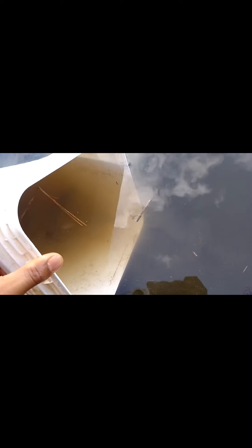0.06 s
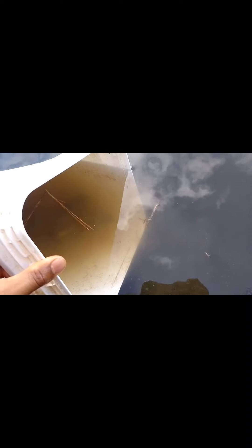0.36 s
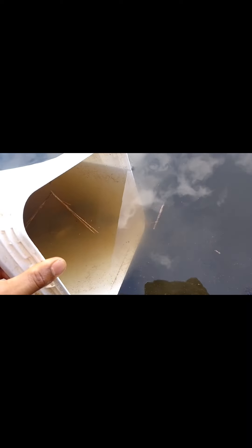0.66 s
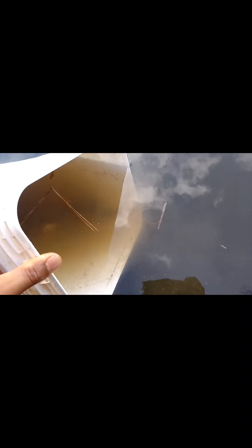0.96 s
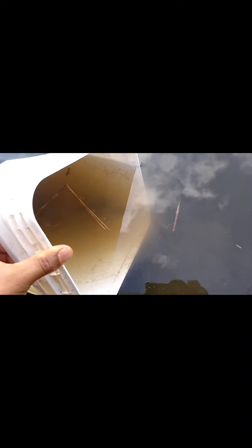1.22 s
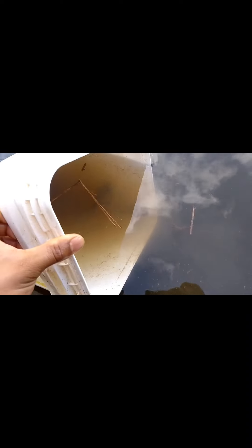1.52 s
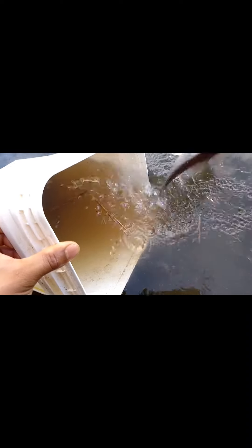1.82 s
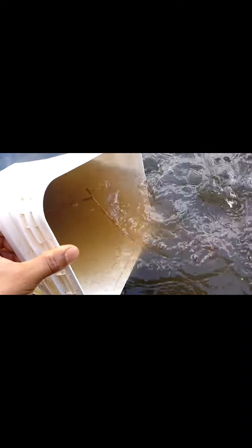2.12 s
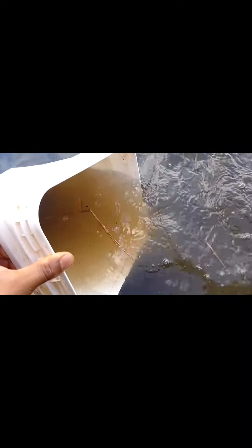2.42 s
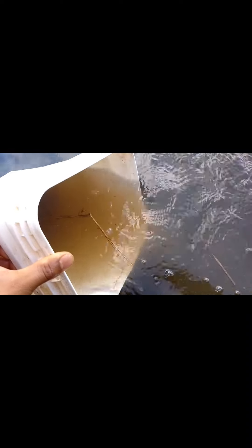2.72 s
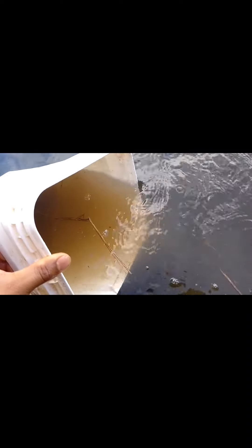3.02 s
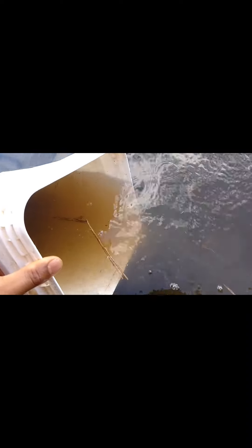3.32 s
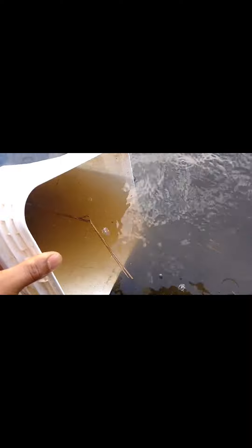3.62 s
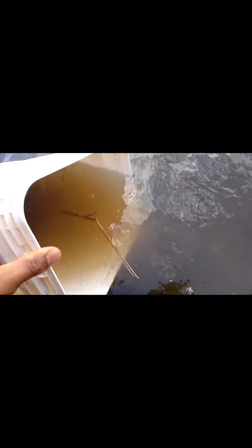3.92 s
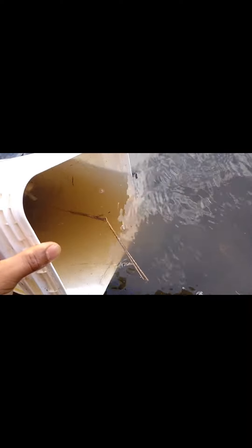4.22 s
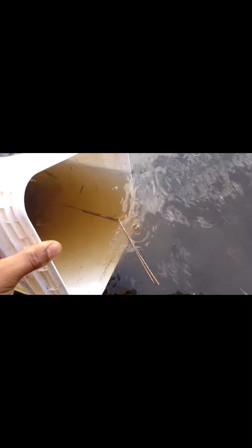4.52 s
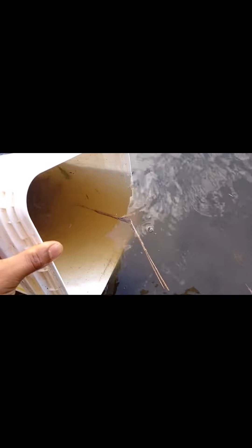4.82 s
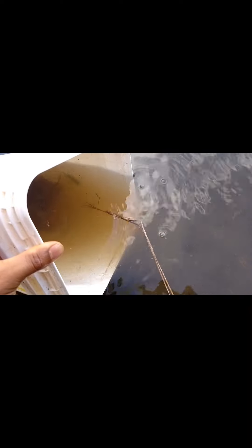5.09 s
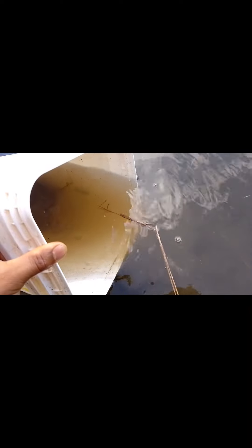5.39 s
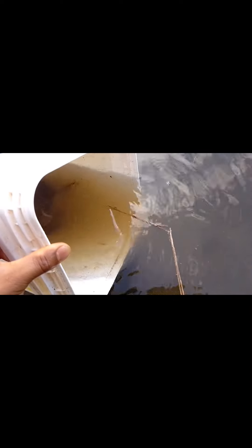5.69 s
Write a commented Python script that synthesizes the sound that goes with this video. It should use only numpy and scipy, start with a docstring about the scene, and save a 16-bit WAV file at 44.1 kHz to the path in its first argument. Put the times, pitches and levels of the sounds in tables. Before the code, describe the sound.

A plastic tub thumps and tips water into a reservoir with a sharp splash, amid faint insects and distant birds.

```python
"""The edge of a reservoir, one microphone close to the water. A plastic tub is tipped out in front
of it: the tub thumps, the load slaps into the water, spray patters down and trapped bubbles ring.
Insects buzz in the grass all round, and near the end a bush-cricket starts scraping its wings,
shrill and high. Far off across the water, birds whistle and chatter."""
import sys
import numpy as np
from scipy import signal
from scipy.fft import rfft, irfft
from scipy.io import wavfile
from scipy.ndimage import uniform_filter1d

SR = 44100
rng = np.random.default_rng(int(sys.argv[2]) if len(sys.argv) > 2 else 0)


def wav_out(sig):
    """Save sig, one row per channel (or a flat mono array), as 16-bit PCM at SR to the path in sys.argv[1]."""
    wavfile.write(sys.argv[1], SR, np.round(np.clip(np.atleast_2d(sig).T, -1, 1) * 32767).astype(np.int16))


N = 253575
TIME = np.arange(N) / SR
POUR_S, POUR_END_S, LAST_DROPS_S = 1.75, 2.224, 2.5
CRICKET_S = 4.25

# Spectra of the open air and the insect chorus. Each row: frequency in Hz, relative level in dB.
AIR_SPECTRUM = [(25, -14), (70, -15.5), (110, -23), (150, -23), (210, -6), (300, 1), (420, 2.5),
                (800, -1.5), (1500, 2), (2600, 5.5), (3600, 3.5), (4700, 2), (11000, 3), (15500, -5.5)]
CHORUS_SPECTRUM = [(4800, -44), (5700, -11.5), (6400, -13.5), (7100, -6), (7500, -2.5), (8200, 1),
                   (8900, 0.5), (9400, -2.5), (9950, 2), (10350, -16), (11500, -29)]
# The chorus rising and falling in the grass. Each row: time in seconds, level in dB.
CHORUS_LEVELS = [(0, -57), (.6, -56.5), (1.7, -56), (2.5, -59.5), (3.0, -58.5), (3.6, -57), (4.3, -57),
                 (5.75, -57.5)]
# Harsh calls of the nearer birds. Each row: start in seconds, level in dB, centre in Hz,
# decay in seconds.
NEAR_CALLS = [(0.038, -68.5, 2810, 0.15), (0.233, -62.5, 2400, 0.011), (.545, -62, 2480, 0.037),
              (.8, -67, 1800, 0.038), (.933, -63, 1600, 0.0064), (1.315, -59.5, 3260, 0.011),
              (2.645, -63, 2190, 0.047), (2.925, -62, 2370, .025), (3.139, -61.5, 2910, .043),
              (3.175, -56.5, 2090, .022), (3.404, -58.5, 1536, 0.047), (3.6, -61.5, 2240, .026),
              (4.084, -64, 2420, .021), (4.503, -62, 1900, 0.0076), (4.588, -64, 3690, .018),
              (4.975, -61, 2690, .022), (5.265, -62, 2820, .022), (5.638, -62, 2870, 0.0064),
              (5.693, -62, 2900, 0.014)]
# Bird whistles. Each row: start in seconds, length in seconds, top pitch in Hz, level in dB,
# droop at the ends in octaves.
BIRD_WHISTLES = [(1.43, 0.12, 5980, -68, 0.17), (2.348, .26, 5030, -64, 0.043),
                 (3.384, 0.29, 6000, -66, .14), (5.323, 0.057, 6820, -62.5, .05),
                 (5.365, .13, 6020, -60, 0.51), (5.465, .06, 4500, -66, .22)]
# Jolts of the tub. Each row: start in seconds, pitch of its hollow in Hz, level in dB.
TUB_JOLTS = [(1.621, 297, -59.5), (1.662, 288, -58.5), (1.751, 272.4, -32.5), (1.761, 290, -36.5),
             (1.794, 262, -37.5), (1.888, 310, -43.5), (1.964, 280, -57.5)]
# The hollow's ring. Each row: multiple of its pitch, level against the jolt in dB, decay in seconds.
HOLLOW_MODES = [(1, -1, .010), (1.25, -11.5, 0.012), (2.07, -25.5, 0.013), (2.96, -17, 0.013)]
# Slow flexing of the whole tub. Each row: frequency in Hz, relative level in dB, decay in seconds.
FLEX_MODES = [(126, -3, .02), (95, -3, .02), (76, -6, .022)]
# Dry ticks by the water. Each row: start in seconds, level in dB, centre in Hz, width in Hz.
EDGE_TICKS = [(1.658, -58, 2457, 4988), (2.789, -51.5, 12150, 2500)]
# Spectra of fine mist and coarse drops. Each row: frequency in Hz, relative level in dB.
MIST_SPECTRUM = [(2500, -16.5), (4100, -9), (5500, -9), (7500, 5), (10000, 2), (12500, 0.5), (15500, -5)]
COARSE_SPECTRUM = [(200, 8), (550, -39), (760, -13), (1100, -12.5), (1500, 2), (2000, 4), (3200, 5.5),
                   (4500, -42), (7000, -24)]
# Surges that throw up extra spray. Each row: start in seconds, relative level in dB, decay in seconds.
SPRAY_SURGES = [(1.823, -30, 0.02), (1.883, -33, 0.018), (1.967, -37.5, 0.02), (2.001, -38.5, 0.0053)]
# Slaps on the surface. Each row: start in seconds, rms level at the crest in dB, cavity centre in Hz,
# decay in seconds, crack against cavity in dB.
WATER_SLAPS = [(1.753, -48, 1700, 0.014, 1), (1.7633, -41, 6760, 0.0039, -12),
               (1.7937, -35.5, 2060, .01, 20), (1.809, -34.5, 1700, 0.028, -4),
               (1.8219, -28, 4070, 0.0037, 12), (1.8334, -16, 2300, .0056, -1),
               (1.894, -15.5, 1750, 0.00248, 1), (1.9107, -15.5, 6700, .0015, -2),
               (1.93, -27, 2690, .011, 0), (1.985, -27, 6700, 0.011, 7), (2.072, -33, 1460, .003, -9),
               (2.127, -36.5, 2780, 0.0099, -1), (2.173, -37.5, 4540, 0.0072, 5),
               (2.233, -32.5, 4370, .0034, 15), (2.249, -41, 3180, 0.0037, 2)]
# Spectrum of a slap's crack. Each row: frequency in Hz, relative level in dB.
CRACK_SPECTRUM = [(300, -22), (1200, -5.5), (4000, 10), (10000, 6), (13000, 7), (15500, -16.5)]
# The loudest air pockets. Each row: start in seconds, pitch in Hz, peak in dB, cycles per decay time.
AIR_POCKETS = [(1.784, 1870, -40, 7), (1.800, 1990, -37, 16), (1.812, 1030, -39, 11),
               (1.819, 1767, -30, 14), (1.8225, 4050, -16, 8.5), (1.8355, 1715, -20, 7),
               (1.846, 774, -45, 19), (1.851, 1916, -30, 14), (1.9114, 6640, -6, 9.1),
               (1.913, 6010, -11.5, 9.7), (1.931, 767, -38, 6.7), (1.950, 990, -36.5, 4.5),
               (2.016, 785, -37, 6.1), (2.086, 1246, -33.5, 9.8), (2.12, 2750, -37, 10),
               (2.127, 1130, -34, 6.9), (2.141, 3400, -36, 19), (2.174, 803, -36.5, 18.3),
               (2.192, 1125, -39.5, 8.5)]
# Spectrum of the bush-cricket's rasp. Each row: frequency in Hz, relative level in dB.
RASP_SPECTRUM = [(6000, -29), (9000, -16), (10400, -4.5), (11100, 0.5), (11400, -9.5), (12000, -6),
                 (12700, -1), (14300, -3), (14800, -6), (15600, -7.5)]


def undb(db):
    """Decibels to gain."""
    return 10 ** (np.asarray(db) / 20)


def unit(x):
    """Scale to an rms of 1."""
    return x / np.sqrt(np.mean(x ** 2))


def since(start):
    """Seconds gone by since the start; zero before it."""
    return np.maximum(TIME - start, 0)


def colour(x, spectrum):
    """Filter a sound through a curve of (Hz, dB) points, at rms 1."""
    hz, db = np.transpose(spectrum)
    bins_hz = np.maximum(np.fft.rfftfreq(len(x), 1 / SR), 1)
    gain = undb(np.interp(np.log(bins_hz), np.log(hz), db, left=-90))
    return unit(irfft(rfft(x) * gain, len(x)))


def band(x, hz, width_hz):
    """A steep resonance, at rms 1."""
    b, a = signal.iirpeak(min(hz, SR / 2 - 2000), hz / width_hz, fs=SR)
    return unit(signal.lfilter(b, a, signal.lfilter(b, a, x)))


def walk(rate_hz):
    """A random wander at rms 1: held steps, smoothed twice."""
    hold = int(SR / rate_hz)
    steps = np.repeat(rng.standard_normal(N // hold + 1), hold)
    return unit(uniform_filter1d(uniform_filter1d(steps, hold), hold)[:N])


def add(out, start, x):
    """Mix a sound in at a start given in seconds."""
    i = int(start * SR)
    out[i:i + len(x)] += x[:len(out) - i]


def swell(t, rise, decay):
    """A smooth rise, then an exponential decay."""
    return np.sin(np.pi / 2 * np.minimum(t / rise, 1)) ** 2 * np.exp(-np.maximum(t - rise, 0) / decay)


def tone(hz):
    """A sine that follows a changing pitch."""
    return np.sin(2 * np.pi * np.cumsum(hz) / SR)


def ring(hz, decay, rise, octaves_per_s=0):
    """A damped oscillation whose pitch may glide."""
    t = TIME[:int(np.log(1000) * decay * SR) + 2]
    return swell(t, rise, decay) * tone(hz * 2 ** (octaves_per_s * t))


def with_tail(x, wet_db, decay):
    """A faint, dying tail: a long one gives a soft echo, a very short one a slightly ringing grain."""
    t = TIME[:int(7 * decay * SR)]
    tail = rng.standard_normal(len(t)) * swell(t, decay / 12, decay)
    return x + undb(wet_db) * signal.fftconvolve(x, tail / np.linalg.norm(tail))[:N]


def open_air():
    """Quiet open air, with a distant flock flickering in the midrange."""
    flock = sum(band(rng.standard_normal(N), hz, .35 * hz) * undb(7.1 * walk(21.99))
                for hz in np.geomspace(1600, 3500, num=6))
    return undb(-65) * colour(rng.standard_normal(N), AIR_SPECTRUM) + undb(-76) * unit(flock)


def insect_chorus():
    """Many insects in the grass all round blur into a fluttering hiss."""
    hiss = colour(with_tail(rng.standard_normal(N), wet_db=-11, decay=.0025), CHORUS_SPECTRUM)
    level_db = np.interp(TIME, *np.transpose(CHORUS_LEVELS))
    flutter_db = .61 * walk(160) + .54 * walk(35)
    return hiss * undb(level_db + flutter_db)


def strokes(rate_hz, wander, spread_db):
    """One impulse for each wing stroke, slightly uneven in pace and strength."""
    cycles = np.floor(np.cumsum(rate_hz * (1 + wander * walk(25))) / SR)
    return np.diff(cycles, prepend=0) * undb(spread_db * rng.standard_normal(N))


def scrape(length_s):
    """One pass of an insect's scraper over the uneven teeth of its file."""
    n = int(length_s * SR)
    return rng.standard_normal(n) * signal.windows.hann(n)


def grasshopper(fade_db_per_s=.5):
    """One grasshopper nearer the microphone scrapes in fast pulses, slowly fading."""
    pulses = np.convolve(strokes(rate_hz=78, wander=.0069, spread_db=1.5), scrape(.007))[:N]
    return band(pulses, hz=9320, width_hz=250) * undb(-65.5 - fade_db_per_s * TIME)


def bird_chatter(low_hz=1520, high_hz=3260):
    """Short harsh calls: a few nearer birds, and many far ones at random times and pitches."""
    out, t = np.zeros(N), TIME[:SR // 3]
    far_calls = [(when * TIME[-1], -72 + 2.5 * (size - .5), low_hz * (high_hz / low_hz) ** pitch, .027)
                 for when, size, pitch in rng.random((30, 3))]
    for start, db, hz, decay in NEAR_CALLS + far_calls:
        voice = band(rng.standard_normal(len(t)), hz, .17 * hz)
        add(out, start, undb(db) * swell(t, .0054, decay) * voice)
    return out


def bird_whistles():
    """Thin, wavering whistles from across the water arch up and down in pitch and level."""
    out = np.zeros(N)
    for start, length, top_hz, db, droop in BIRD_WHISTLES:
        along = 2 * np.minimum(since(start) / length, 1) ** .7 - 1  # -1 to 1, quicker on the climb
        hz = top_hz * 2 ** (-droop * np.abs(along) ** 2.6) * (1 + .0075 * walk(220))
        out += (1 - along ** 2) * undb(db + 3 * walk(70)) * tone(hz)
    return out


def tub(flex_db=-14.5):
    """Close by, the shifting load jolts the tub: its hollow rings briefly and its thin walls flex."""
    out = np.zeros(N)
    for start, hollow_hz, jolt_db in TUB_JOLTS:
        for multiple, db, decay in HOLLOW_MODES:
            add(out, start, undb(jolt_db + db) * ring(multiple * hollow_hz, decay, rise=.0079))
        for hz, db, decay in FLEX_MODES:
            add(out, start, undb(jolt_db + flex_db + db) * ring(hz, decay, rise=.016))
    return out


def ticks():
    """Faint, dry clicks near the water's edge."""
    out, t = np.zeros(N), TIME[:SR // 16]
    for start, db, hz, width_hz in EDGE_TICKS:
        click = swell(t, rise=.001, decay=.004) * band(rng.standard_normal(len(t)), hz, width_hz)
        add(out, start, undb(db) * click)
    return out


def drops(low_hz, high_hz, cycles, spread_db, count):
    """A patter of droplets, each trapping a tiny bubble that rings for a few rising cycles."""
    out = np.zeros(N)
    for when, pitch, size, life in rng.random((count, 4)):
        hz = low_hz * (high_hz / low_hz) ** pitch
        decay = cycles * 4 ** (2 * life - 1) / hz
        bubble = ring(hz, decay, rise=.5 / hz, octaves_per_s=.015 / decay)
        add(out, POUR_S + when * (LAST_DROPS_S - POUR_S), undb(spread_db * size ** 2) * bubble)
    return out


def flow(rise, hold, thinning_db_per_s):
    """Strength of the falling sheet of water: it builds, holds, then thins out."""
    return swell(since(POUR_S), rise, np.inf) * undb(-thinning_db_per_s * since(POUR_S + rise + hold))


def spray(stop_db_per_s=38, trickle_s=2.245):
    """Mist and coarse drops rain down, small pockets tinkle and gurgle, and the rim trickles last."""
    mist = colour(drops(3000, 14500, cycles=2.1, spread_db=11, count=4000), MIST_SPECTRUM)
    tinkle = unit(drops(3000, 11000, cycles=14, spread_db=15, count=500))
    coarse = colour(drops(650, 5500, cycles=5, spread_db=14.5, count=1100), COARSE_SPECTRUM)
    gurgle = unit(drops(1100, 3800, cycles=9, spread_db=7.5, count=120))
    trickle = unit(drops(2800, 3500, cycles=11, spread_db=12, count=160))
    trickle *= undb(-51.5) * swell(since(trickle_s), rise=.01, decay=.058)
    surge = sum(undb(db) * swell(since(start), .022, decay) for start, db, decay in SPRAY_SURGES)
    fine_flow = undb(-42.5) * flow(rise=.08, hold=.22, thinning_db_per_s=50) + surge
    heavy_flow = undb(-43) * flow(rise=.035, hold=.23, thinning_db_per_s=135) + undb(-7.5) * surge
    fine = (undb(.5) * mist + undb(-3.5) * tinkle) * fine_flow
    heavy = (coarse + undb(-8.5) * gurgle) * heavy_flow
    stopping = undb(-stop_db_per_s * since(POUR_END_S))
    share = np.sqrt((LAST_DROPS_S - POUR_S) * SR / N)  # refers the rms to the time the drops fill
    return share * ((fine + heavy) * stopping + trickle)


def slaps():
    """Each slap on the water squeezes a short-lived cavity and throws off a broad crack."""
    out, t = np.zeros(N), TIME[:SR // 8]
    for start, db, hz, decay, crack_db in WATER_SLAPS:
        cavity = band(rng.standard_normal(len(t)), hz, .46 * hz)
        crack = colour(rng.standard_normal(len(t)), CRACK_SPECTRUM)
        envelope = swell(t, .0024, decay)
        slap = unit(envelope * (cavity + undb(crack_db) * crack))
        add(out, start, undb(db) * slap * np.sqrt(np.mean(envelope ** 2)))
    return out


def wall_echo(x, delay_s, gain):
    """The flat side of the tub throws the splash back to the microphone a moment later."""
    lag = round(delay_s * SR)
    return (x + gain * np.pad(x, (lag, 0))[:N]) / np.sqrt(1 + gain ** 2)


def bubbles():
    """Air pockets gulp as the water closes; the smaller the pocket, the higher its note."""
    out = np.zeros(N)
    for start, hz, db, cycles in AIR_POCKETS:
        add(out, start, undb(db) * ring(hz, decay=cycles / hz, rise=3 / hz, octaves_per_s=.44))
    return out


def warm_up(full_db, climb_db, time_constant):
    """The bush-cricket's strength: it grows quickly at first, then levels off."""
    return undb(full_db - climb_db * np.exp(-since(CRICKET_S) / time_constant)) * (TIME > CRICKET_S)


def bush_cricket(wing_hz=13700, creak_from_hz=15600, creak_to_hz=11750):
    """A bush-cricket sets off with a falling creak; its scraped wings ring more as it warms up."""
    beats = strokes(rate_hz=122.8, wander=.0051, spread_db=1.4)
    t = TIME[:int(.0095 * SR)]
    stroke = signal.windows.hann(len(t))
    teeth = unit(np.convolve(beats, scrape(.027))[:N])  # repeats with the teeth of the file
    rub = unit(np.convolve(beats, stroke)[:N] * rng.standard_normal(N))  # new at every stroke
    rasp = colour(rub + undb(-5) * teeth, RASP_SPECTRUM)
    rasp *= warm_up(full_db=-51.5, climb_db=15.5, time_constant=.38)
    wing = unit(np.convolve(beats, stroke * np.sin(2 * np.pi * wing_hz * t))[:N])
    wing *= warm_up(full_db=-41.5, climb_db=45, time_constant=.37)
    age = since(CRICKET_S)
    creak_hz = creak_to_hz + (creak_from_hz - creak_to_hz) * np.exp(-age / .028) + 550 * walk(3000)
    creak = undb(-60) * tone(creak_hz) * swell(age, rise=.015, decay=.09)
    return rasp + wing + creak


def scene():
    """From the bank, in mono: the splash close up, insects all round, birds echoing over the water."""
    waterside = open_air() + insect_chorus() + grasshopper()
    birds = with_tail(bird_chatter() + bird_whistles(), wet_db=-6.5, decay=.083)
    water = wall_echo(spray() + slaps(), delay_s=.00152, gain=.21)
    splash = with_tail(tub() + ticks() + water + bubbles(), wet_db=-13.5, decay=.057)
    return (waterside + birds + splash + bush_cricket())[None]


def record(dry, dc_offset=-.0002):
    """The camera's microphone thins the deepest bass, cuts the top and sits slightly off zero."""
    low_cut = signal.butter(2, 45, "highpass", fs=SR, output="sos")
    high_cut = signal.ellip(10, .2, 80, 15400, fs=SR, output="sos")
    return signal.sosfilt(high_cut, signal.sosfilt(low_cut, dry)) + dc_offset


dry = scene()
out = record(dry)
wav_out(out)
```